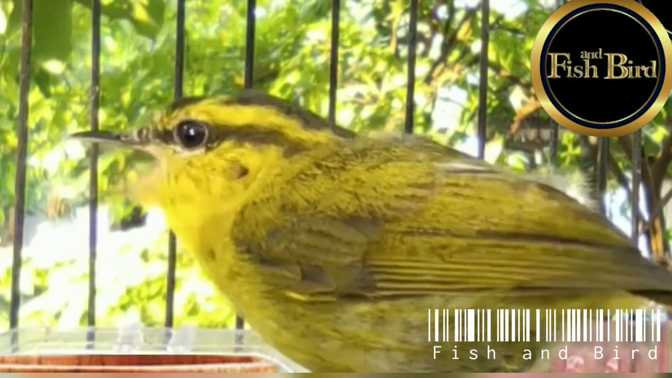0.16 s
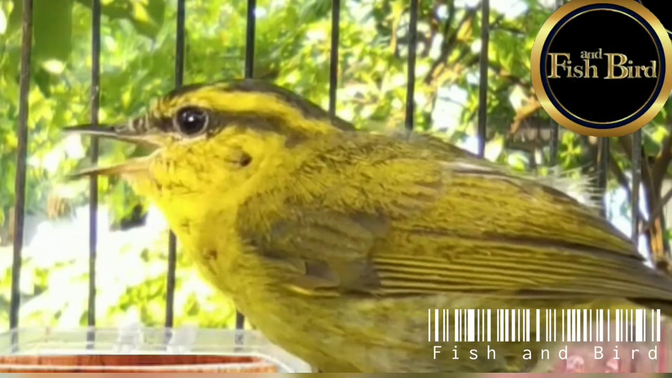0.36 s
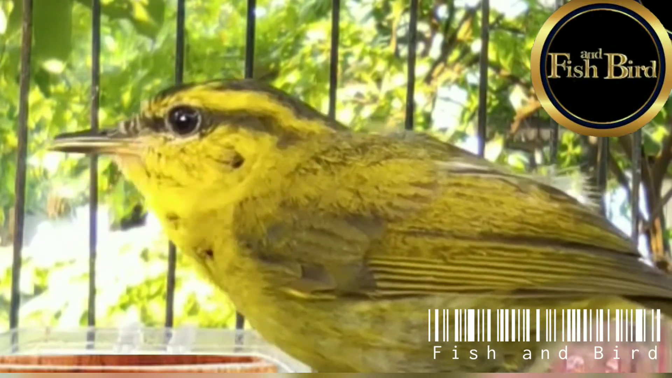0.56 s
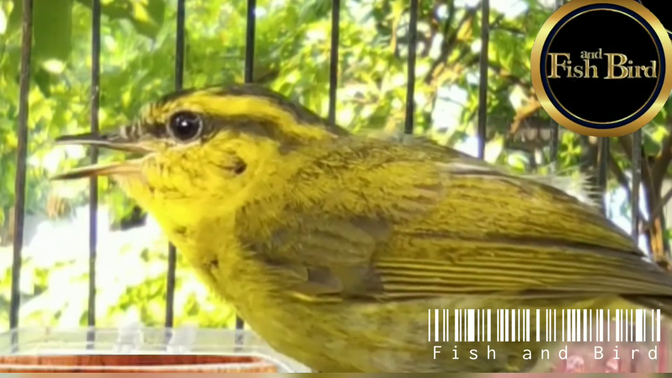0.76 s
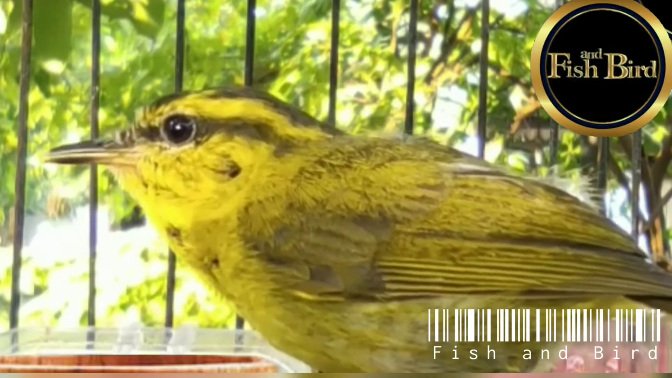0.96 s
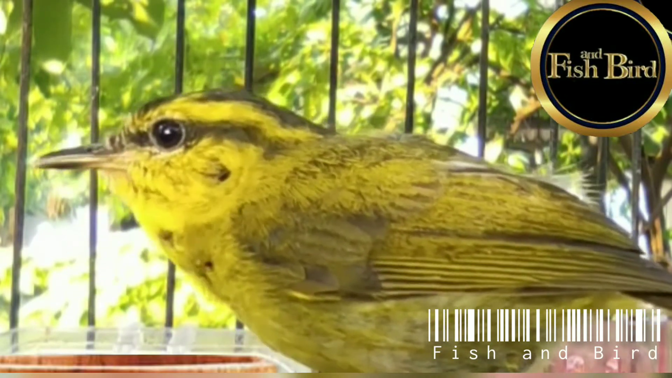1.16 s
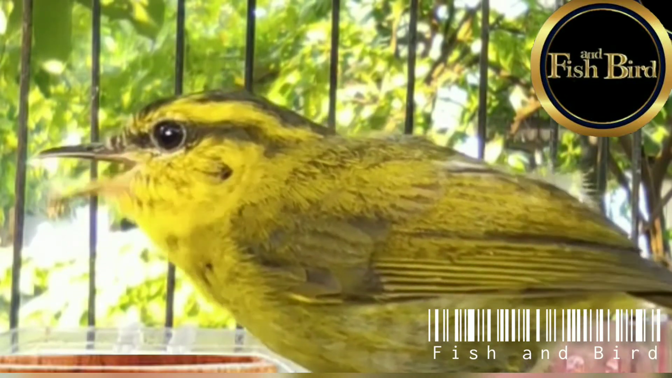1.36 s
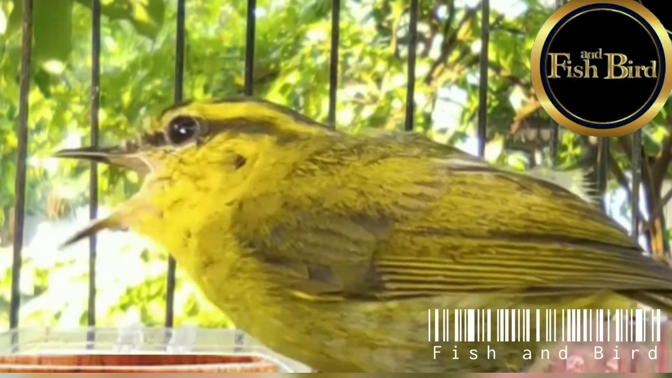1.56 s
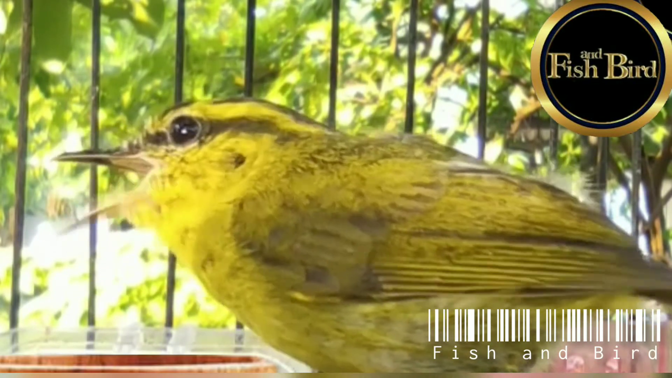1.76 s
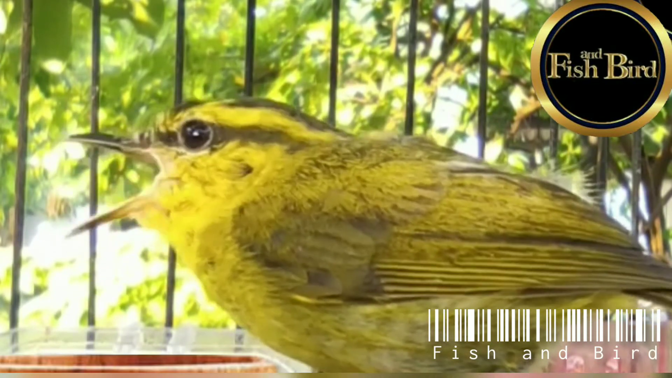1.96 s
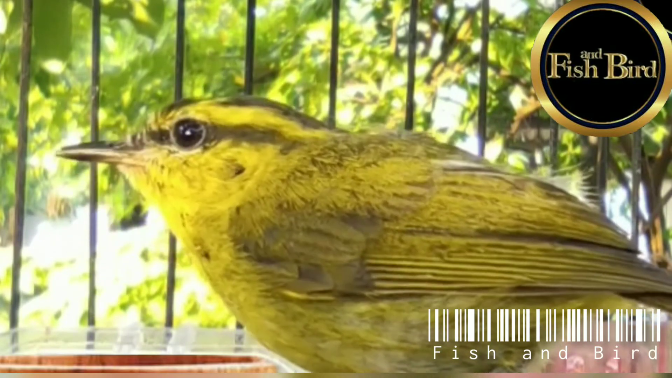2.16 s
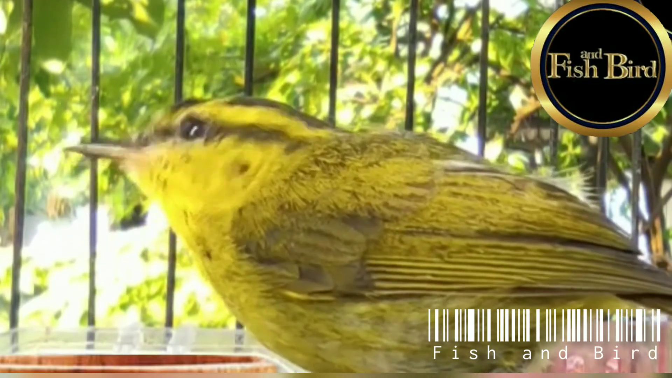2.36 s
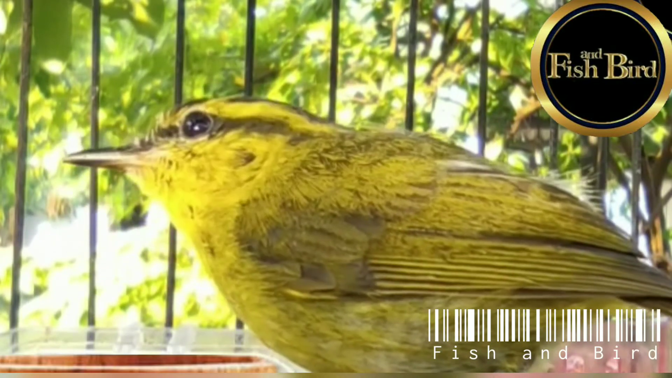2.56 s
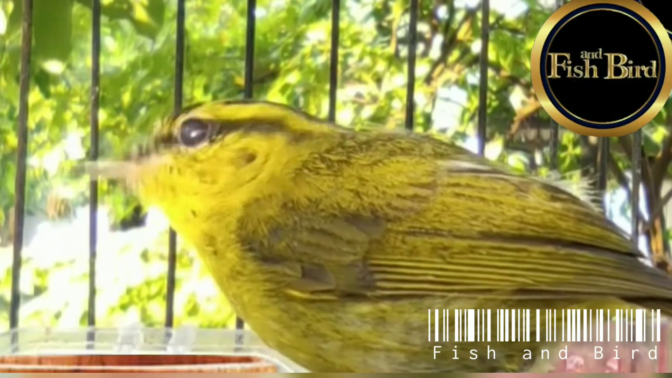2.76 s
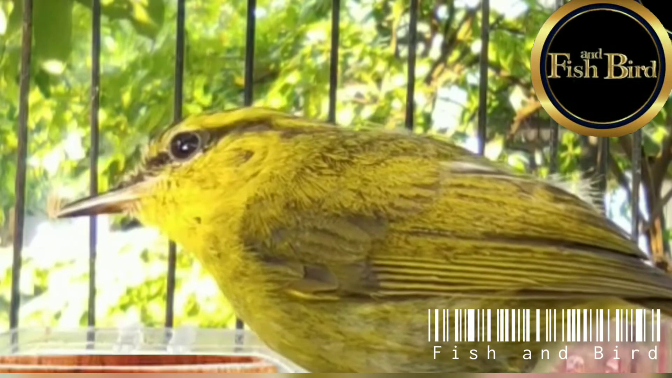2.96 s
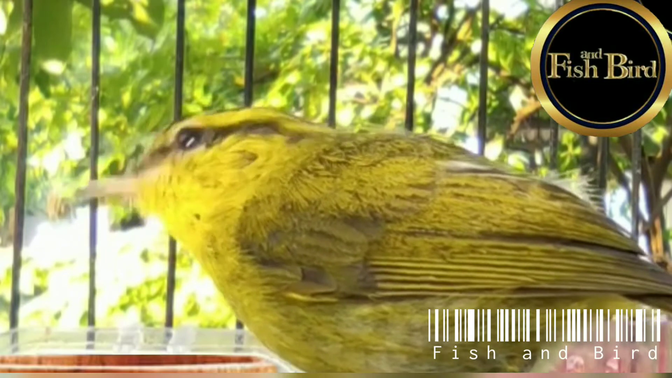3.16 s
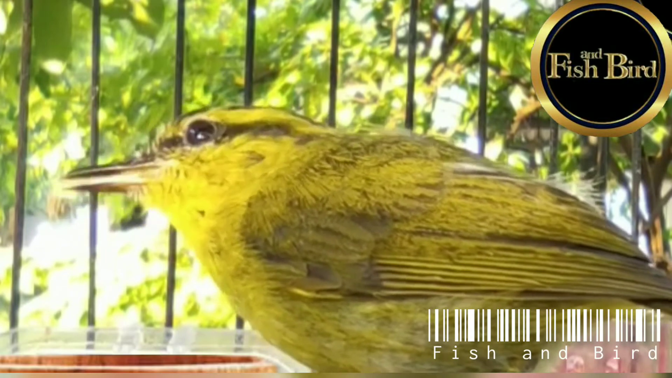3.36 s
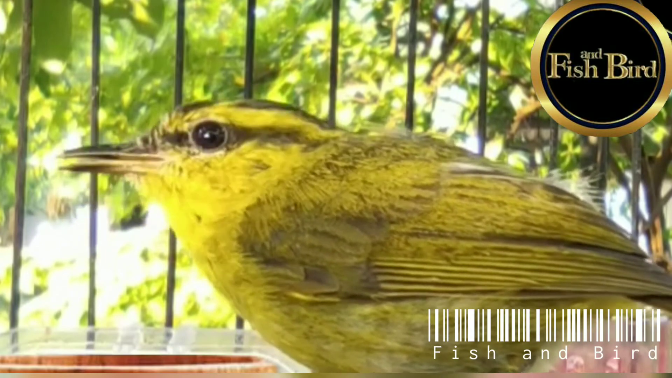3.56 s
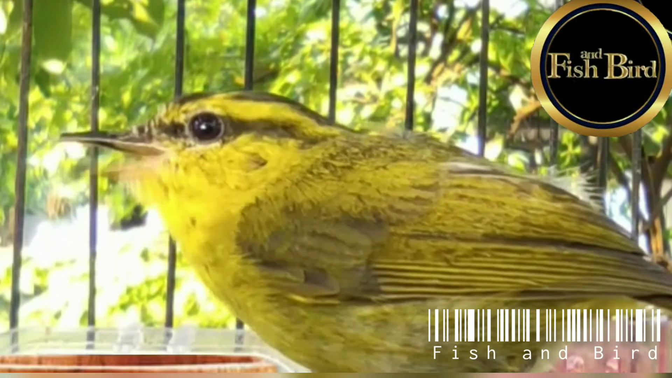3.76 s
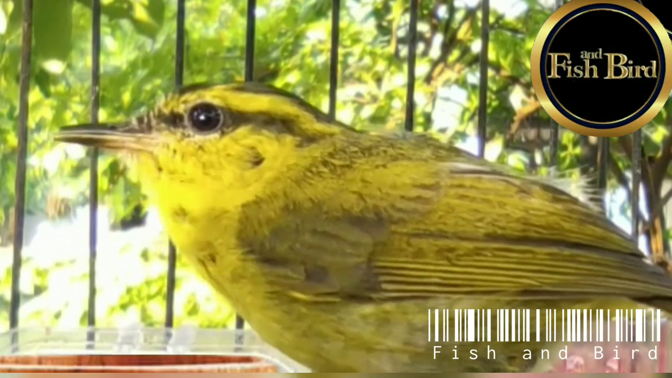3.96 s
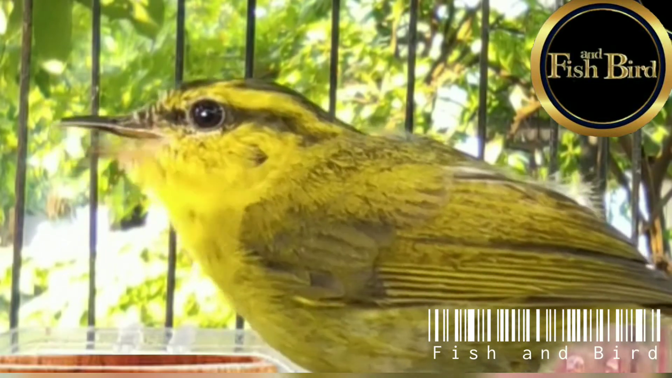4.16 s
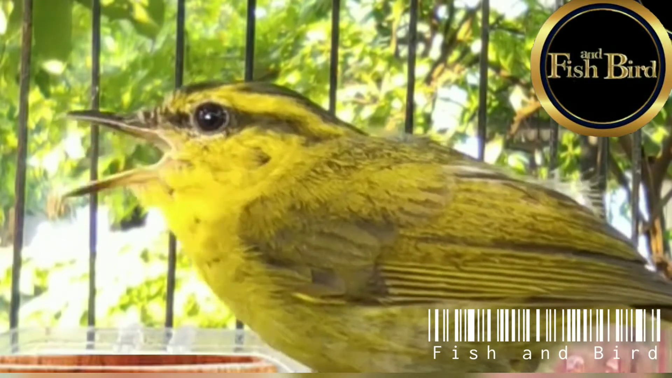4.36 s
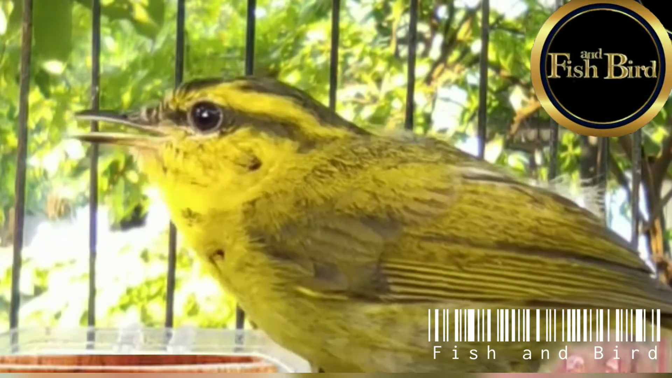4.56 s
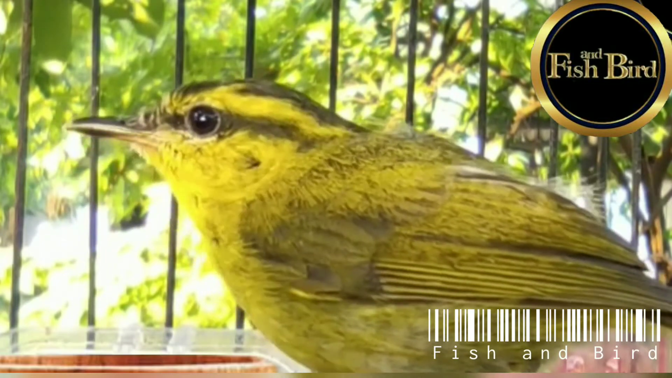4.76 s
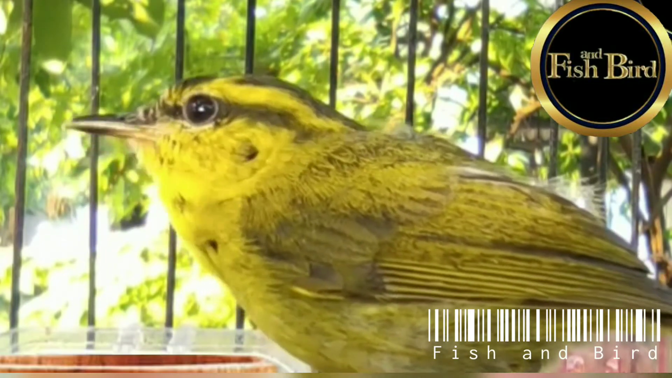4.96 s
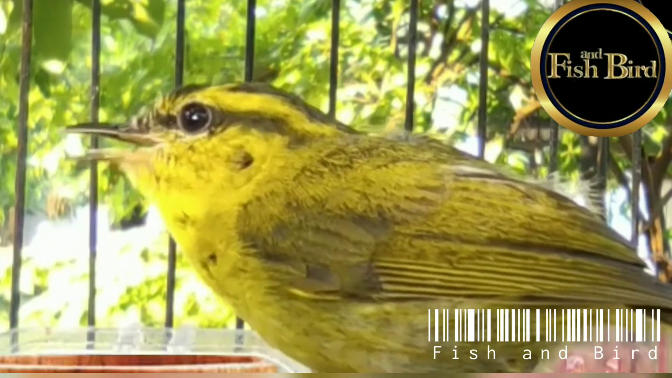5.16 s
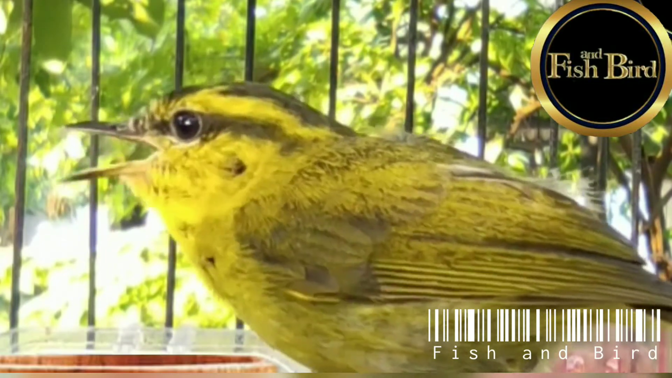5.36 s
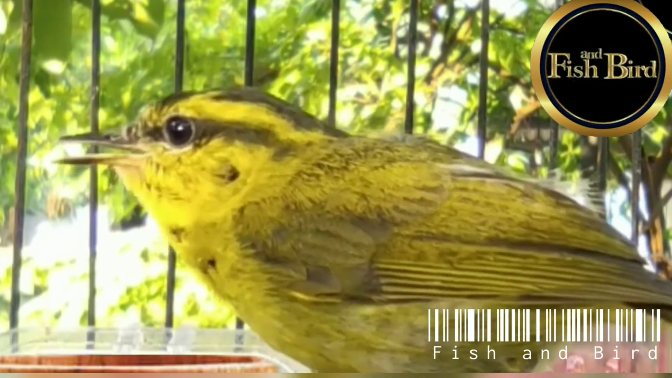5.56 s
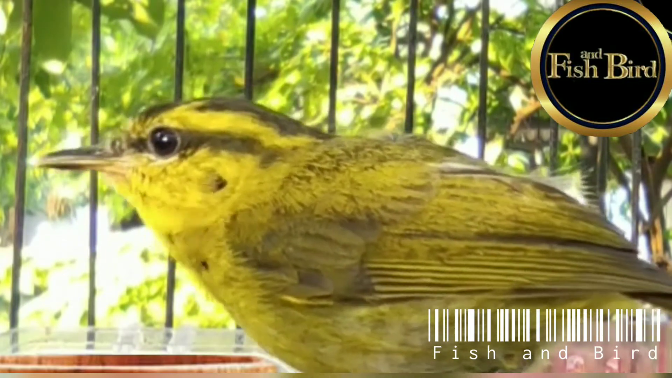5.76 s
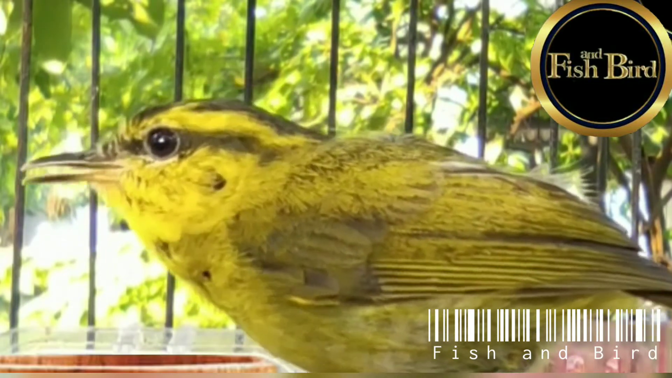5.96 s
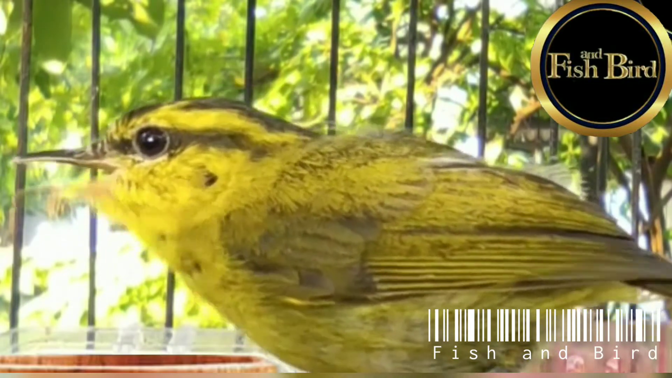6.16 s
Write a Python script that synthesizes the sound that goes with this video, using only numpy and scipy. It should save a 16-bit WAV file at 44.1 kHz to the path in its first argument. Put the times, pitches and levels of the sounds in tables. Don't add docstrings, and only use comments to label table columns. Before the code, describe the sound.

Bright, jittery warbler syllables leap and swoop in rapid succession, with short metallic cage reflections and a gritty overloaded edge. After the first phrase come blurred faraway chirps and faint dove notes, then a second phrase builds back to full force and continues to the end. Steady outdoor hiss and swelling engine rumble lie beneath, at a town-edge yard.

```python
import sys
import numpy as np
from scipy import signal
from scipy.fft import rfft, irfft, next_fast_len
from scipy.io import wavfile
from scipy.ndimage import uniform_filter1d

SR = 44100
rng = np.random.default_rng(int(sys.argv[2]) if len(sys.argv) > 2 else 0)


def put_to_file(sound):
    columns = np.atleast_2d(sound).T
    safe = np.clip(columns, -1, 1)
    whole_steps = np.round(safe * 32767)
    wavfile.write(sys.argv[1], SR, whole_steps.astype(np.int16))


def invert_db(level):
    return 10 ** (np.asarray(level, dtype=float) / 20)


N = 274302


def evened(x):
    return x / np.sqrt(np.mean(x ** 2) + 1e-20)


def read(points, hz):
    f, value = np.transpose(points)
    return np.interp(np.log(hz + 1), np.log(f + 1), value)


def add(mix, start_s, sound):
    part = mix[..., round(start_s * SR):][..., :sound.shape[-1]]
    part += sound[..., :part.shape[-1]]


def wobble(size, span):
    smooth = uniform_filter1d(rng.standard_normal(size), span)
    return evened(uniform_filter1d(smooth, span))


# (time [s], bass [dB], whoosh [dB])
TRAFFIC = [
    (0, -5.5, -10),
    (0.802, 0, -3),
    (1.198, -6, -3),
    (2.901, -6, -1),
    (3.298, 2.5, 2.5),
    (5.199, 2, 2),
    (5.602, -9, 3),
    (6.22, -2, 5.5),
]
# (pitch [Hz], level [dB], wander [Hz])
ENGINES = [
    (86, -52, 10),
    (150, -50, 8),
    (177, -57, 6),
]


def engines():
    s, bass_db, _ = np.transpose(TRAFFIC)
    swell_db = 1.5 * np.interp(np.arange(N) / SR, s, bass_db)
    out = np.zeros(N)
    for hz, db, wander_hz in ENGINES:
        turns = 2 * np.pi * np.cumsum(hz + wander_hz * wobble(N, 5000)) / SR
        level_db = db + 3 * wobble(N, 3000) + (hz < 120) * swell_db
        out += invert_db(level_db) * np.sin(turns)
    return np.sqrt(2) * out * invert_db(np.array([[1.8], [-2.4]]))


# (pitch [Hz], level per Hz [dB])
BACKGROUND_COLOUR = [(29, -22), (60, 0), (277, -8.5), (711, -18), (950, -16), (1070, -20), (2810, -22.5),
                     (3670, -25), (6710, -17.5), (14500, -29), (16000, -77)]


def town(hz, t):
    s, bass_db, whoosh_db = np.transpose(TRAFFIC)
    drone_db = 3 * np.exp(-((hz - 150) / 30) ** 2)
    insect_end_db = -9 * (hz > 9700)
    bass = 1 / (1 + (hz / 120) ** 4)
    middle = np.exp(-np.log((hz + 1) / 800) ** 2)
    traffic_db = bass * np.interp(t, s, bass_db) + middle * np.interp(t, s, whoosh_db)
    return read(BACKGROUND_COLOUR, hz) + drone_db + insect_end_db + traffic_db


# (pitch [Hz], left-right likeness [-1 to 1])
LIKENESS = [(30, .75), (60, 0.9), (300, 0.75), (700, -.2), (2380, -0.1), (15000, -0.32)]
# (pitch [Hz], left minus right [dB])
LEFT_LEAN = [(60, 3.5), (380, 4), (800, 3), (2380, 0), (15000, -1)]


def background_hiss():
    patchy_db, level_db = 4, -37
    frames, hz = N // 256 + 5, np.fft.rfftfreq(1024, 1 / SR)
    a, b, c, d, patches = rng.standard_normal((frames, 513, 5)).T
    patches = evened(uniform_filter1d(uniform_filter1d(patches, 14, 0), 14, 1))
    same = np.clip(read(LIKENESS, hz), -1, 1)[:, None]
    left = a + 1j * b
    right = same * left + np.sqrt(1 - same ** 2) * (c + 1j * d)
    z = np.array([left, right])
    z = z * invert_db(np.array([.5, -.5])[:, None, None] * read(LEFT_LEAN, hz)[:, None])
    colour_db = town(hz[:, None], np.arange(frames) * 256 / SR)
    patches_db = patchy_db * patches * np.minimum(hz[:, None] / 1000, 1)
    z = z * invert_db(colour_db + patches_db)
    return invert_db(level_db) * evened(signal.istft(z, nperseg=1024, noverlap=768)[1][:, :N])


# (pitch [Hz], time [s])
YARD_FADE = [(800, 1), (3000, 0.4), (6000, .35), (10000, 0.5)]


def yard(x, gap_s, stretch):
    taps = np.zeros((2, SR))
    at = np.arange(20, SR - 20, 20) + rng.integers(0, 20, (2, SR // 20 - 2))
    np.put_along_axis(taps, at, rng.choice([-1., 1.], at.shape), 1)
    hz, t, z = signal.stft(taps, SR, nperseg=256)
    fade = invert_db(-60 * t / (stretch * read(YARD_FADE, hz)[:, None]))
    tail = signal.istft(z * fade, SR, nperseg=256)[1]
    tail = np.pad(tail, ((0, 0), (round(gap_s * SR), 0)))
    return signal.fftconvolve(x, tail / np.linalg.norm(tail[0]), axes=1)[:, :N]


def calls(rows, rough):
    out = np.zeros((2, N))
    for (s, length, *hz, db), side_db in zip(rows, rng.uniform(-3, 1, len(rows))):
        u = np.arange(round(length * SR)) / (length * SR)
        glide = np.interp(u, np.linspace(0, 1, len(hz)), hz)
        pitch = uniform_filter1d(glide, len(u) // 6, mode="nearest")
        tone = np.sin(2 * np.pi * np.cumsum(pitch) / SR) * (1 + rough * wobble(len(u), 60))
        tone *= (pitch / np.maximum(pitch, hz[-1])) ** 4
        tone = tone * signal.windows.tukey(len(u), .5)
        add(out, s, invert_db(db + side_db * np.array([[1], [-1]])) * tone)
    return out


# (length [s], then pitches at even steps [Hz])
CALL_KINDS = dict(swoop=(.016, 3800, 3000, 2000), rise=(.14, 2050, 2350, 2750, 3000, 3300, 3620, 3600),
              low=(.11, 2420, 2560, 2660), zip=(.035, 3600, 3800, 5200),
              sink=(.055, 7100, 6200, 5500, 5050), murmur=(.09, 2100, 2206, 2440),
              hoot=(.045, 960, 940, 930), stroke=(.022, 4900, 4500, 3600), rasp=(.025, 9800, 8200, 6800))
# (time [s], length [s], first pitch [Hz], last pitch [Hz], level
# [dB])
LONG_LOW_TONES = [
    (.58, .32, 1085, 1090, -54),
    (.6, .42, 685, 680, -53),
    (.87, .13, 925, 920, -51),
    (1.03, .14, 950, 965, -52),
    (1.12, .39, 960, 980, -49),
    (1.12, .36, 1015, 1030, -49),
    (1.25, .3, 490, 495, -55),
    (4.67, .22, 820, 1060, -51),
    (4.85, .14, 1045, 1085, -50),
    (4.76, .15, 600, 715, -55),
]
# (time [s], level [dB])
DOVE_HOOTS = [
    (1.67, -56),
    (1.89, -54),
    (2.14, -57),
    (2.54, -57),
    (2.71, -54),
    (2.91, -57),
    (3.53, -54),
]


def far_horns_and_dove():
    rows = [(s, length, a, (a + b) / 2, b, db) for s, length, a, b, db in LONG_LOW_TONES]
    rows += [(s, *CALL_KINDS["hoot"], db) for s, db in DOVE_HOOTS]
    dove = calls(rows, .4)
    return invert_db(3) * (dove + invert_db(-3) * yard(dove, .01, .6))


# (time [s], level [dB])
CALL_TIMES = dict(swoop=[(.025, -42), (.885, -42), (3.475, -37), (4.365, -43), (5.5, -41), (3.085, -52)],
              rise=[(.13, -36), (.985, -36), (3.58, -31.5), (4.48, -35), (5.61, -35)], low=[(1.9, -54),
              (3.96, -50.5), (5.99, -52)], zip=[(1.24, -36), (2.045, -32.5), (3.262, -37), (4.1, -43),
              (5.68, -39.5), (6.14, -43)], sink=[(.93, -38), (2.64, -58), (2.89, -57), (3.1, -56)],
              stroke=[(2.385, -56), (2.725, -55), (3.445, -43)], murmur=[(3.12, -54), (3.56, -53)],
              rasp=[(.06, -58), (1.55, -47), (1.6, -50), (3.54, -55), (4.55, -54), (5.15, -52),
              (5.175, -52), (5.48, -54)])
BLURRED = ("swoop", "zip", "sink", "stroke", "rasp")


def far_bursts():
    bursts = calls([(s, *CALL_KINDS[kind], db) for kind in BLURRED for s, db in CALL_TIMES[kind]], 1.1)
    return invert_db(9) * bursts + invert_db(15.5) * yard(bursts, .004, .9)


# (time [s], length [s], pitch [Hz], level [dB])
FAR_WHISTLES = [(.28, .044, 4830, -40), (.32, .072, 6200, -38), (.42, .086, 5420, -42),
                (.68, .09, 5650, -42), (.8, .12, 6300, -43), (.98, .11, 4850, -39), (1.37, .027, 7200, -40),
                (1.6, .017, 7550, -38.5), (1.71, .012, 6250, -32), (2.33, .14, 4900, -54.5),
                (2.7, .14, 4900, -51), (2.73, .024, 7350, -47.5), (3.23, .023, 2760, -45.5),
                (3.262, .04, 3650, -44), (3.28, .04, 4150, -48), (3.28, .05, 4950, -48),
                (3.58, .048, 6950, -50), (3.865, .034, 7000, -38), (4.93, .42, 3640, -51),
                (5.14, .025, 7600, -46), (5.22, .093, 7300, -46.5), (6.055, .088, 6950, -39)]


def far_birds():
    kinds = [kind for kind in CALL_TIMES if kind not in BLURRED]
    rows = [(s, *CALL_KINDS[kind], db) for kind in kinds for s, db in CALL_TIMES[kind]]
    rows += [(s, length, hz * .98, hz, hz, db) for s, length, hz, db in FAR_WHISTLES]
    birds = calls(rows, .45)
    return invert_db(14.5) * birds + invert_db(14) * yard(birds, .004, .9)


# (delay [ms], gain [factor])
CAGE_PATHS = [
    [(0.052, 0.79), (0.412, 0.52), (0.9, 0.295), (0.275, 0.28), (0.212, -0.48), (0.035, 0.084)],
    [(0, 1), (1.756, 0.25), (1.094, -0.245), (0.385, 0.325), (0.764, -0.34), (0.536, 0.355)],
]


def cage(x):
    size = next_fast_len(N + SR)
    hz = np.fft.rfftfreq(size, 1 / SR)
    ports = [sum(g * np.exp(-2j * np.pi * hz * ms / 1000) for ms, g in port) for port in CAGE_PATHS]
    shade = invert_db(np.array([[0.5], [-2.5]]) / (1 + (7800 / (hz + 1)) ** 16))
    return irfft(rfft(x, size) * np.array(ports) * shade, size)[:, :N]


# (pitch [Hz], level [dB])
BEAK_OCTAVE = [(6000, 18.5), (7800, 1), (8400, -9), (8900, 0), (9600, -7), (10500, -15), (11500, -26),
               (14000, -40)]
# (pitch [Hz], level [dB])
THIRD_PARTIAL = [(10000, -40), (13000, -40), (15000, -22), (16500, -45)]


def note(rows, octave_db):
    s, hz, db = np.transpose(rows)
    t = np.arange(s[0], s[-1], 1 / SR)
    pitch = uniform_filter1d(np.interp(t, s, hz), 110, mode="nearest")
    turns = 2 * np.pi * np.cumsum(pitch * (1 + .0025 * wobble(len(t), 40))) / SR
    level = invert_db(np.interp(t, s, db) + .9 * wobble(len(t), 200))
    tone = np.sin(turns)
    tone = tone + invert_db(octave_db + read(BEAK_OCTAVE, 2 * pitch)) * np.sin(2 * turns)
    third = invert_db(read(THIRD_PARTIAL, 3 * pitch)) * level ** 2
    tone = tone + third * np.sin(3 * turns)
    since_start = t - s[0] + (s[0] == 0)
    edge = np.clip(np.minimum(since_start, s[-1] - t) / 0.0027, 0, 1)
    return np.sqrt(2) * level * tone * edge


# (time [ms], pitch [Hz])
MOTIF_GLIDES = dict( flick=[(0, 4300), (4, 4400), (11, 6650), (22, 5500), (33, 5090), (63, 5680),
                (76, 5760)], lift=[(0, 3600), (33, 3570), (56, 3880), (94, 4110)], scoop=[(0, 5300),
                (26, 4690), (81, 4175), (99, 4230), (134, 5110), (156, 5170)], leap=[(0, 3220), (16, 3390),
                (51, 3060), (60, 5080), (66, 5120), (74, 4880), (90, 4640), (136, 4110), (146, 4010)],
                dot=[(0, 4330), (14, 4390), (36, 4420)], slide=[(0, 4350), (14, 4200), (40, 3820),
                (64, 3800), (89, 3670)], arch=[(0, 3110), (8, 3320), (76, 3415), (120, 3200), (130, 3050)],
                spike=[(0, 3790), (19, 3970), (28, 6750), (34, 6880), (43, 6550), (52, 5000), (62, 3620),
                (104, 3240), (150, 3530), (167, 3480)], climb=[(0, 3690), (10, 3920), (40, 3820),
                (88, 4280), (111, 4420)])
# (time [ms], pitch [Hz])
FLOURISH_GLIDES = dict( tail=[(0, 6130), (20, 6300), (33, 6500), (44, 6780)], peak=[(0, 5480), (34, 5480),
                   (43, 5950), (57, 7450), (70, 5200), (102, 4440), (118, 4620), (134, 5720), (202, 6340)],
                   blip=[(0, 5190), (10, 5330), (33, 5280)], hold=[(0, 5000), (12, 5160), (44, 5000),
                   (73, 5040)], bow=[(0, 4400), (11, 4550), (27, 4330), (34, 4590), (50, 5570), (74, 5810),
                   (143, 5460), (216, 4270), (235, 4020)])
# (time [ms], pitch [Hz])
WARMUP_GLIDES = dict( peep=[(0, 5020), (22, 4920), (52, 5550), (64, 5600)], cup=[(0, 6660), (13, 6660),
                 (38, 5950), (54, 5730), (95, 5420), (149, 5710), (164, 5760)], chip=[(0, 4800), (8, 4850),
                 (30, 4740)], wave=[(0, 5170), (19, 5150), (39, 4720), (53, 4580), (88, 4410), (129, 4670)],
                 tick=[(0, 3390), (7, 3670), (25, 3200), (56, 3360)], dip=[(0, 3840), (11, 4210),
                 (48, 3720), (70, 3720), (107, 4250), (121, 4430)], step=[(0, 4330), (10, 4620), (28, 4720),
                 (39, 5330), (48, 5700), (111, 6040), (125, 6100)], jab=[(0, 5020), (8, 5120), (25, 5000)],
                 drop=[(0, 5800), (11, 5780), (40, 5500)], fall=[(0, 4600), (15, 4950), (38, 5410),
                 (59, 4740), (77, 4320), (111, 3900), (163, 3610), (182, 3550)])
# (octave level [dB], efforts at even steps [dB])
BREATH = dict(flick=(-38, [0, 1, -3, -3, -5, -3, -3, -4, -8]), lift=(-11, [-3, -5, -7, -6, 0, 1, 0, -2, 4]),
          scoop=(-30, [-4, -2, 0, -2, -2, -1, 2, 1, 0]), leap=(-24, [5, 0, -3, -7, -1, 1, 0, -1, -4]),
          dot=(-38, [-2, 2, 1, -1]), chip=(-34, [-3, -1, 0, 3]), slide=(-20, [-2, 2, 2, 2, 1, 0, 1, -1, 2]),
          arch=(-25.5, [7, 2, 1, 1, 0, 0, -1, 2]), spike=(-25, [-3, -2, -4, -3, -4, -3, -3, 0, 1]),
          climb=(-23, [3, -4, -3, -1, -1, 2, 3, 0, -5]), tail=(-20, [-3, -3, -3, 0, 3]),
          peak=(-14, [0, -3, -7, -10, -13, -6, -10, -6, -4]), hold=(-14, [0, 0, -1, -3, -1, -4]),
          blip=(-14, [-2, 0, -1, -5, -8]), jab=(-14, [8, 2, -3, -3, -5]),
          bow=(-16, [0, -2, 0, -6, -1, -1, -6, 4, 2]), peep=(-42, [-4, -4, -2, 4]),
          cup=(-31, [-1, -10, -14, -18, -14, -10, -8, -8, -13]), wave=(-13.5, [6, 0, -1, 1, 0, -1]),
          tick=(-19, [5, -1, 0, 3]), dip=(-20, [2, 0, -2, -5, -2, -1, 1, 1]),
          step=(-26, [-5, -2, -3, -5, -7, -7, -6, -7]), drop=(-19.5, [-5, -4, -2, 2, 6]),
          fall=(-10, [-2, 0, -4, -6, -1, -2, -2, -3, -3]))
# (pitch [Hz], level [dB])
THROAT_LOUDNESS = [(3000, -28.5), (3400, -21), (3800, -14.5), (4300, -8), (4700, -8), (5150, -5),
                   (5800, -6), (6500, -3), (7400, -1.5)]


def breath_curve(name, start, length, first_hz, effort_db):
    attack_s, release_s, edge_db = .014, .012, -17
    glide_db, glide_hz_per_ms, regain_ms = -15, 300, 5
    ms, hz = np.transpose({**MOTIF_GLIDES, **FLOURISH_GLIDES, **WARMUP_GLIDES}[name])
    octave_db, push_db = BREATH[name]
    t = np.arange(0, length, 1 / 1000)
    u = t / length
    pitch = np.interp(u, ms / ms[-1], hz) * first_hz / hz[0]
    push = np.interp(u, np.linspace(0, 1, len(push_db)), push_db)
    db = effort_db + read(THROAT_LOUDNESS, pitch) + push
    thin = np.tanh(np.maximum(np.gradient(pitch), 0) / glide_hz_per_ms) ** 2
    recovery = signal.lfilter([1 / regain_ms], [1, 1 / regain_ms - 1], thin)
    db = db + glide_db * np.maximum(thin, recovery)
    opening = np.minimum(t / attack_s + (start == 0), (length - t) / release_s)
    db = db + edge_db * (1 - np.clip(opening, 0, 1)) ** 2
    return np.transpose([start + t, pitch, db]), octave_db


# (syllable [name], time [s], length [s], first pitch [Hz], effort [dB])
FIRST_PHRASE = [("tail", 0, .046, 6130, 5), ("chip", .152, .03, 4250, -13), ("flick", .172, .078, 4350, 3),
                ("lift", .303, .095, 3600, -2), ("scoop", .438, .145, 5320, -1.5),
                ("leap", .627, .146, 3220, 1.5), ("dot", .795, .036, 4340, -1.5),
                ("slide", .837, .089, 4350, -.6), ("arch", .963, .132, 3120, -.6),
                ("spike", 1.139, .165, 3790, -.6), ("climb", 1.34, .111, 3690, .6),
                ("peak", 1.501, .202, 5480, 4.5), ("hold", 1.745, .073, 5000, .6),
                ("blip", 1.843, .034, 5190, 3), ("bow", 1.905, .236, 4400, -.6)]
# (syllable [name], time [s], length [s], first pitch [Hz], effort [dB])
SECOND_PHRASE = [("peep", 3.392, .064, 5020, -22), ("cup", 3.538, .165, 6660, -7),
                 ("chip", 3.732, .042, 4770, -11), ("chip", 3.816, .026, 4950, -10),
                 ("wave", 3.848, .129, 5170, -6), ("tick", 4.024, .056, 3390, -1.5),
                 ("dip", 4.112, .121, 3840, .6), ("step", 4.264, .127, 4330, 1.5),
                 ("drop", 4.432, .04, 5800, -.6), ("jab", 4.483, .027, 5020, -.6),
                 ("fall", 4.543, .182, 4600, -.6), ("chip", 4.897, .034, 4170, -14),
                 ("flick", 4.924, .078, 4260, -3), ("lift", 5.056, .091, 3600, -6),
                 ("scoop", 5.195, .15, 5270, -1.5), ("leap", 5.39, .148, 3220, -.6),
                 ("dot", 5.557, .036, 4310, -2), ("slide", 5.603, .087, 4340, .6),
                 ("arch", 5.736, .122, 3100, .6), ("spike", 5.909, .171, 3790, .6),
                 ("climb", 6.118, .114, 3690, .6)]


def warbler():
    song = np.zeros(N)
    for row in FIRST_PHRASE + SECOND_PHRASE:
        add(song, row[1], invert_db(2) * note(*breath_curve(*row)))
    effort = uniform_filter1d(abs(song), 900)
    air = signal.lfilter(*signal.butter(1, 6500, fs=SR), rng.standard_normal((2, N)))
    near = cage(song)
    return near + invert_db(-18) * yard(near, 0.0041, 1.05) + invert_db(-26) * effort * air


def scene():
    background = background_hiss() + engines()
    far = far_horns_and_dove() + far_bursts() + far_birds()
    return background + far + warbler()


def squeeze(x, own_db, near_db, loudest_db, treble_db, whim_db, starve_db):
    hz, t, z = signal.stft(x, SR, "cosine", nperseg=2048, noverlap=1024)
    band = np.floor(30 * np.log10(1 + hz / 900)).astype(int)
    member = np.arange(band[-1] + 1)[:, None] == band
    size = np.sqrt(member @ abs(z) ** 2 / member.sum(1, keepdims=True))
    apart = np.arange(len(member))[:, None] - np.arange(len(member))
    spread = invert_db(near_db - np.where(apart > 0, 3.0, -7.0) * apart)
    step = invert_db(own_db) * size + spread @ size + invert_db(loudest_db) * size.max(1, keepdims=True)
    whim = evened(uniform_filter1d(rng.standard_normal(size.shape), size=3))
    step = step[:, band] + invert_db(treble_db) * (hz[:, None] > 9600)
    step = step * invert_db(whim_db * whim[:, band])
    step = step / (1 + (500 / (hz[:, None] + 1)) ** 2)
    z = (np.round(z.real / step) + 1j * np.round(z.imag / step)) * step
    z = z * (hz[:, None] < 16000)
    z = z * ((size[:, band] > invert_db(starve_db) * step) | (hz[:, None] > 9600))
    return signal.istft(z, SR, "cosine", nperseg=2048, noverlap=1024)[1][:, :N]


def roll_off(x):
    return signal.sosfilt(signal.butter(12, 17530, fs=SR, output="sos"), x)


def record(dry):
    swing = uniform_filter1d(abs(signal.hilbert(dry, next_fast_len(N))[:, :N]), 30)
    held = dry / np.maximum(swing / .99, 1)
    grit = np.diff(rng.standard_normal((2, N + 1))) * np.clip(swing - .8, 0, .3)
    clipped = np.clip(held, -.95, .95) + invert_db(-27) * grit
    kept = squeeze(clipped, own_db=-17, near_db=-28.5, loudest_db=-47, treble_db=-77, whim_db=9.5, starve_db=-7)
    return roll_off(np.clip(kept, -1, 1))


dry = scene()
out = record(dry)
put_to_file(out)
```